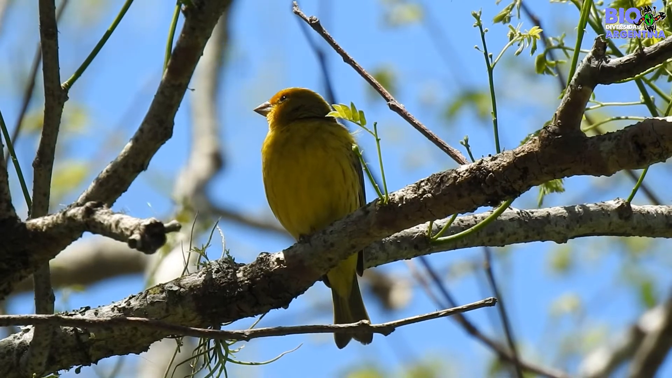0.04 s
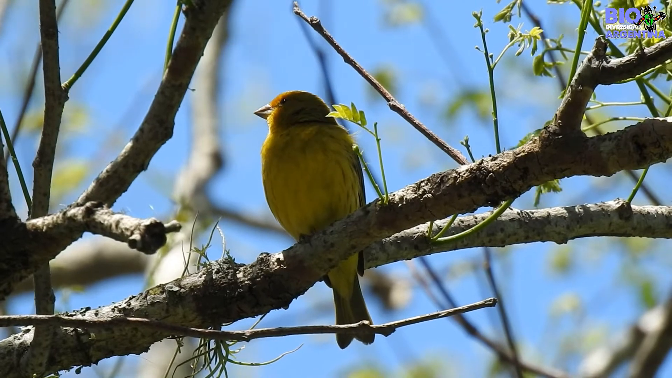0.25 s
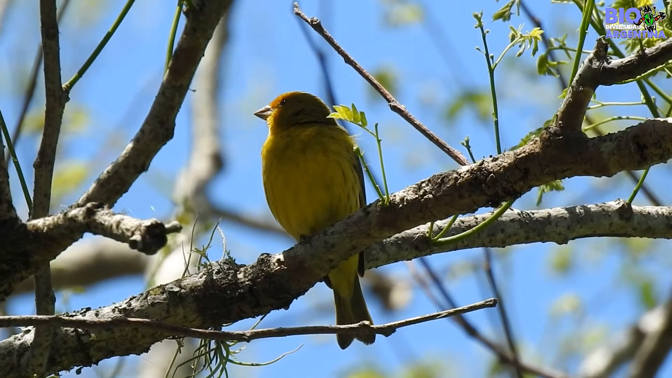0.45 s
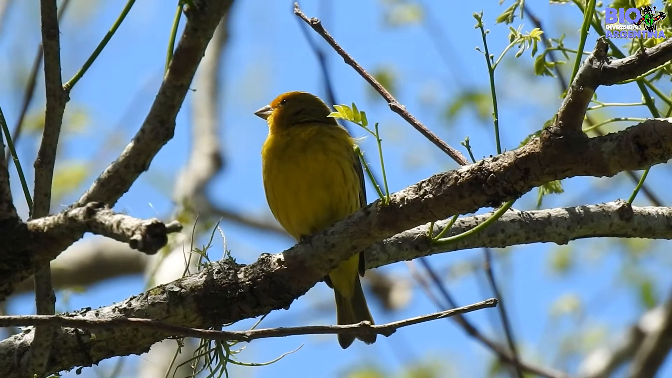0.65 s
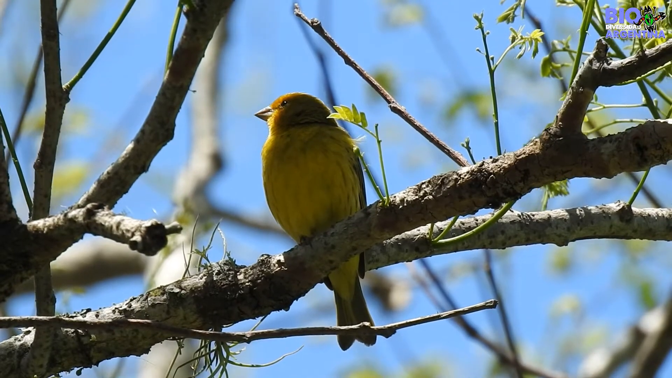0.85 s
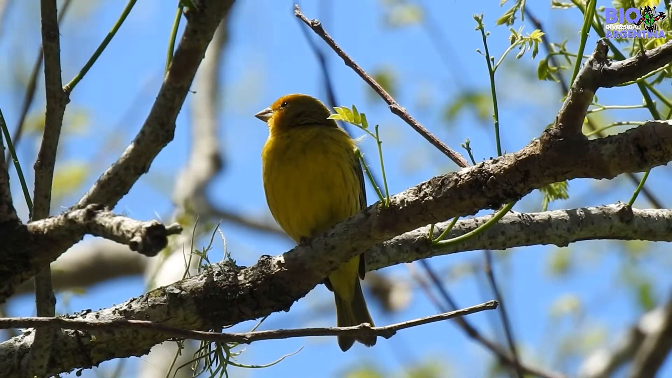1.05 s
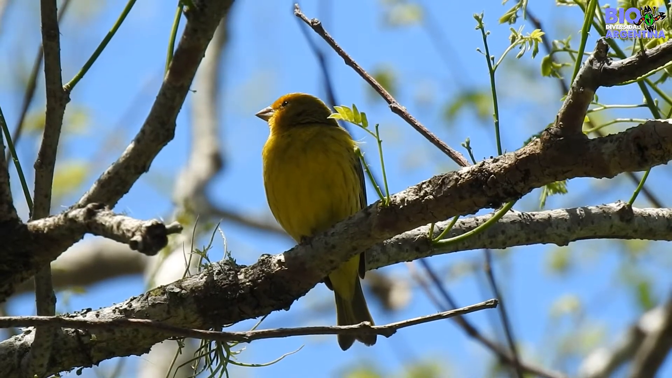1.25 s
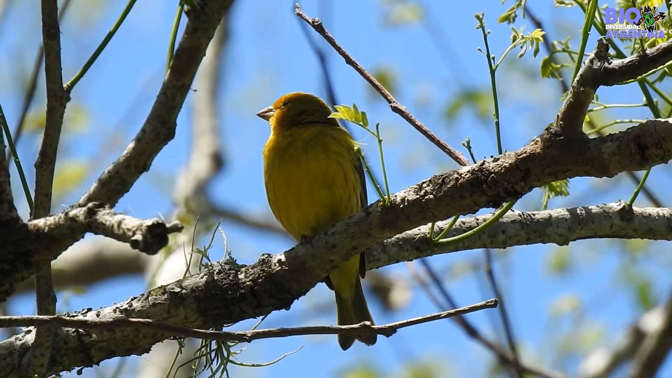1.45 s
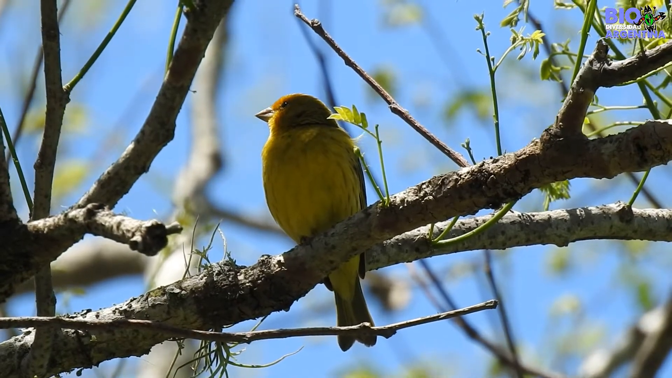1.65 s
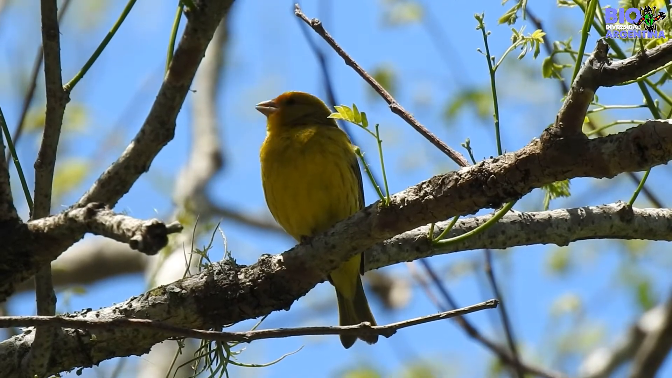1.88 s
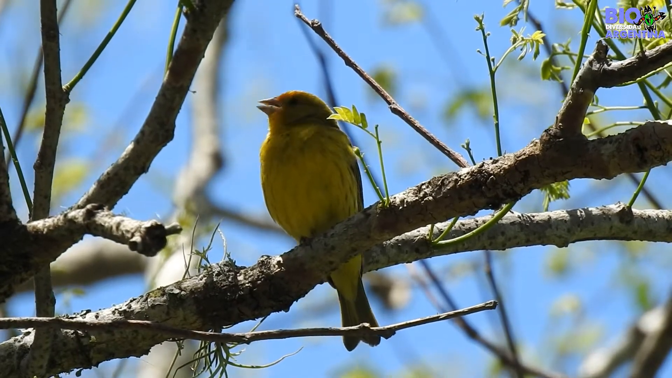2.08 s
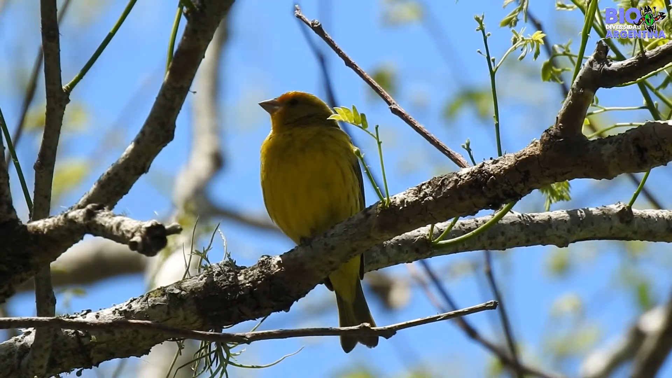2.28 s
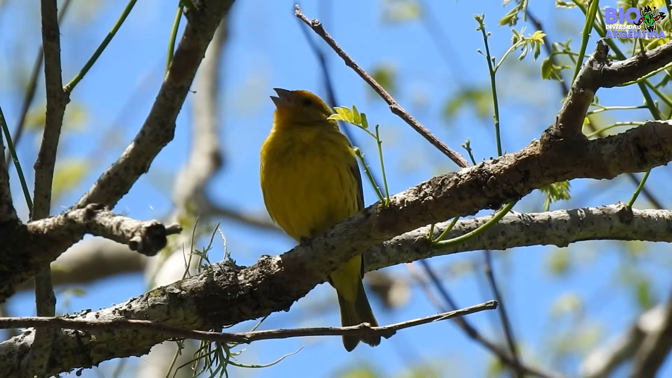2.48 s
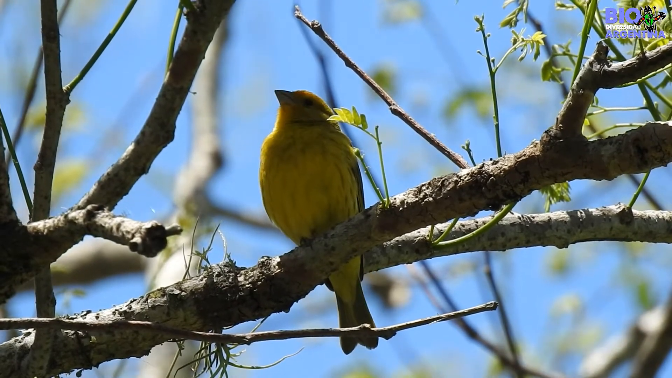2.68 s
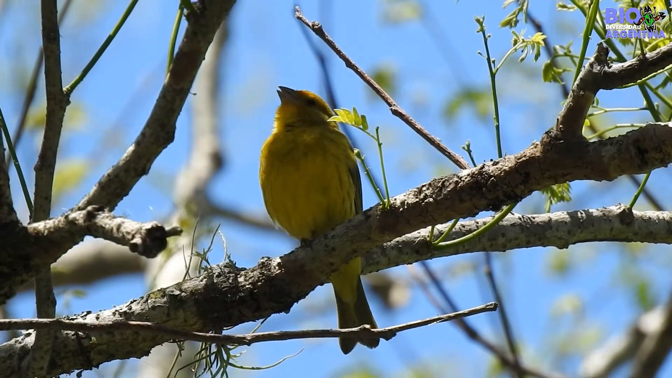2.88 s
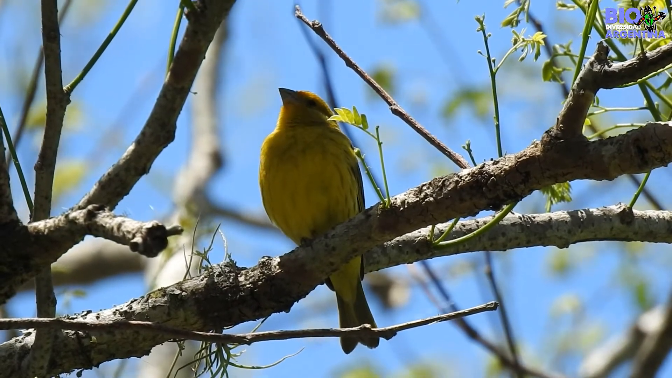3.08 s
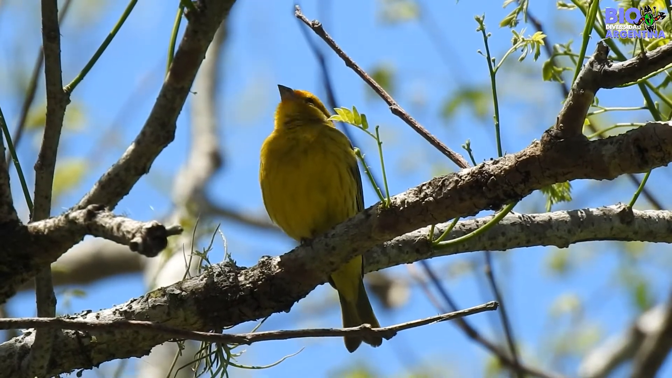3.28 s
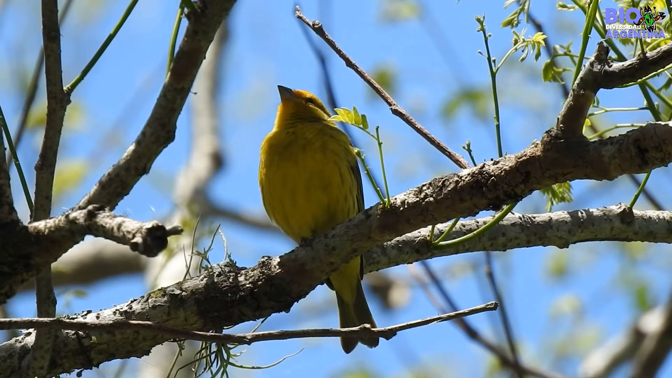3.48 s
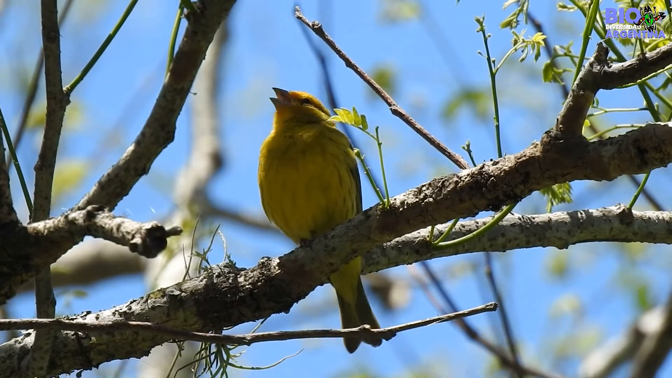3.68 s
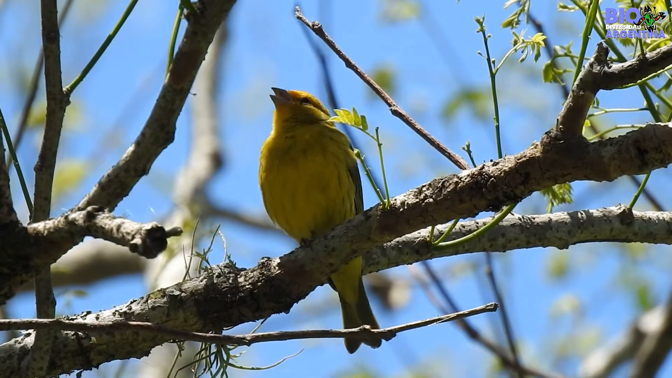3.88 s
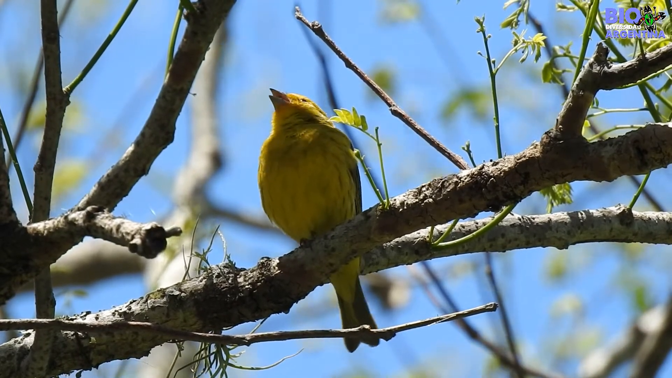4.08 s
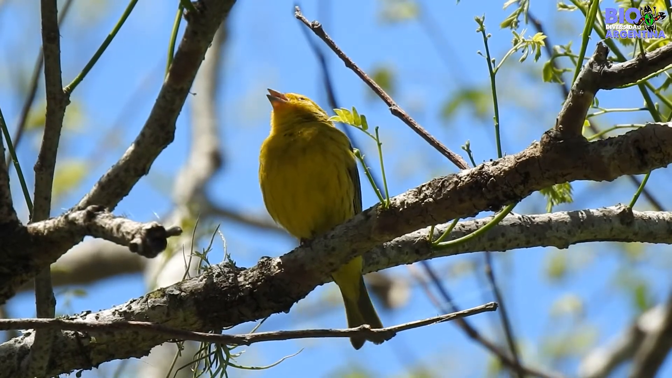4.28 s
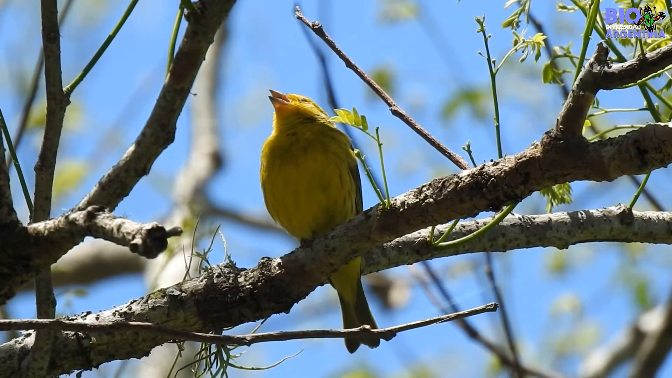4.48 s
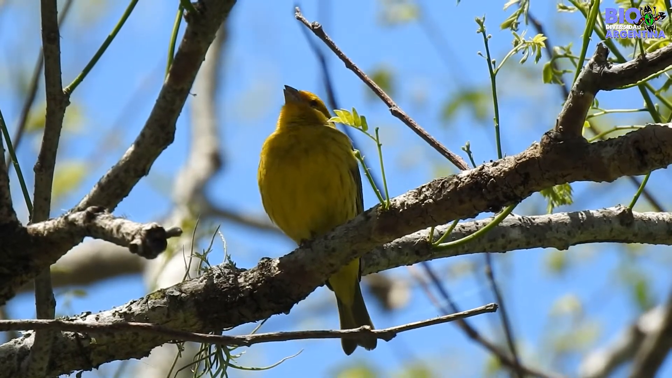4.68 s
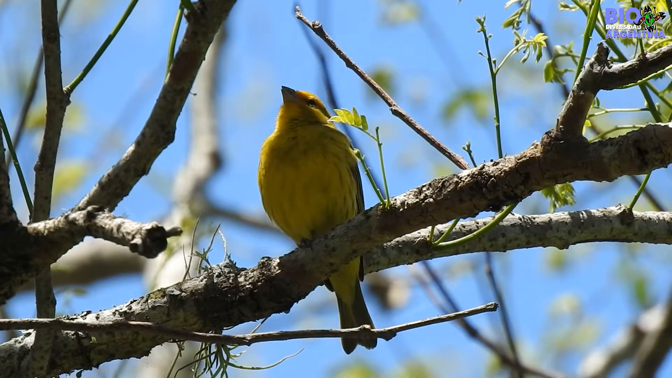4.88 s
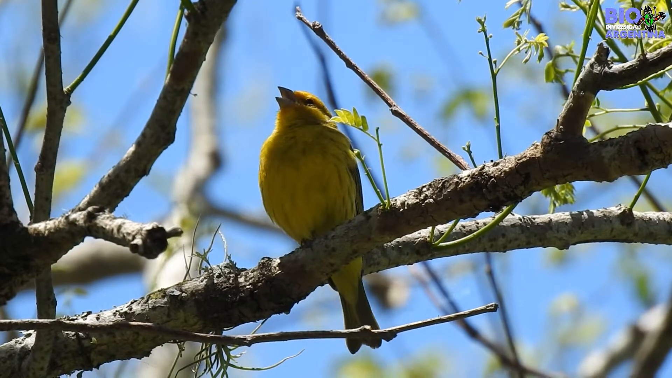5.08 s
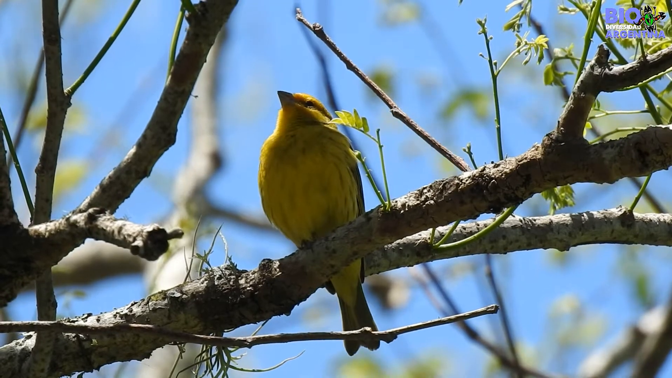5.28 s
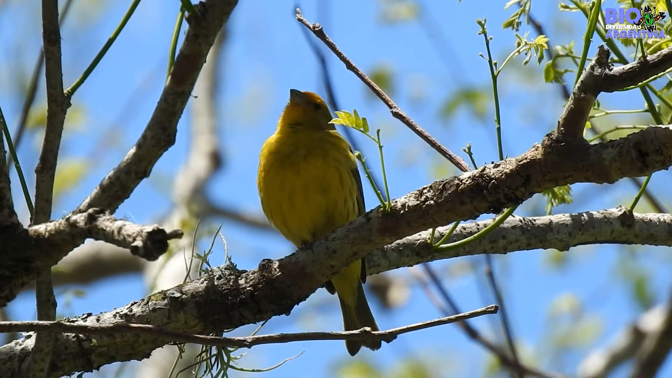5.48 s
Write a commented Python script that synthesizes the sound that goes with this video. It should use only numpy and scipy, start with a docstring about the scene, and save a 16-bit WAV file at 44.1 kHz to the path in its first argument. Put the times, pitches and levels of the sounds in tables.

```python
"""A finch sings close by: a syrinx, modelled as a gliding oscillator, whistles, slurs, trills and warbles.
A second bird chirps on a strong third harmonic, and decaying noise echoes stand for the trees scattering both.
Distant birds pipe and call in plain tones and a dove coos softly.
Far away a small engine, made of firing tones and filtered noise, revs up and down
over a low harmonic hum, a noise rumble and a faint high hiss."""
import sys
import numpy as np
from scipy import signal
from scipy.fft import rfft, irfft, next_fast_len
from scipy.io import wavfile
from scipy.ndimage import uniform_filter1d, map_coordinates

SR = 44100
rng = np.random.default_rng(int(sys.argv[2]) if len(sys.argv) > 2 else 0)


def wrap_up_sound(samples):
    """Save the sound to the file named by the first command line argument, as 16-bit audio."""
    columns = np.atleast_2d(samples).T
    # keep every value between -1 and 1, then stretch to whole-number steps
    tamed = np.clip(columns, -1, 1)
    steps = np.round(tamed * 32767).astype(np.int16)
    wavfile.write(sys.argv[1], SR, steps)


N = 244314

# Harmonics of the hum from the first up: relative level_db
HUM_HARMONICS_DB = [-16, 5, -2, -6, -38.5, -22]
HUM_HZ, HUM_DB = 55, -48
# Spectra of noise, in relative units: frequency_hz, density_db
RUMBLE_SPECTRUM = [(20, -38.5), (35, -8), (55, -6), (90, 1), (210, 0.5), (280, -14.5), (450, -19.5),
                   (900, -62.5)]
HISS_SPECTRUM = [(1410, -48), (2400, -11), (2830, -14), (3080, -1), (3390, -16), (4490, -1.5), (4970, -1.5),
                 (5540, 1), (6900, 6), (8720, -16), (11200, -16.5), (11600, -19.5), (15600, -25)]
RASP_SPECTRUM = [(150, -56), (260, -10), (367, -8), (413, -15), (552, -5.5), (722, -2.5), (925, -10.5),
                 (1060, -7.5), (1380, -1.5), (1750, -7.5), (1960, -5), (2920, -11), (3400, -11.5),
                 (4420, -16.5), (7480, -120)]
EXHAUST_SPECTRUM = [(110, -33.5), (150, 0), (175, 1.0), (220, -1.5), (270, -30.5), (500, -70.0)]
# Engine revs, before inertia rounds the peaks:
# peak_s, peak_firing_hz, run_up_s, run_down_s, exhaust_gain_db, rasp_gain_db
ENGINE_REVS = [(0.418, 87, 0.84, 0.34, 2, 1.5), (1.85, 92.6, .75, 0.2787, 2, -.5),
               (2.782, 118.7, .41, .72, -1, 1), (3.96, 110.7, .31, 0.827, 1.5, 0.5),
               (4.421, 115.4, 0.522, 0.39, 0, 1.5), (5.359, 114, .38, 0.75, 2.5, -1)]
IDLE_HZ, FULL_HZ = 71.34, 117.4  # firing rates at throttle 0 and 1

# Reverberation of the trees: frequency_hz, t60_s
TREE_DECAY = [(2000, 0.24), (6500, 0.44), (10000, 0.27)]

# Glided notes, a lead-in to a turn and a glide away (bow: + steep at first, - steep at last): # start_s,
# lead_in_s, glide_s, start_hz, turn_hz, end_hz, level_db, bow # the first far call is the faint, scattered
# start of the finch's rising whistle at 0.58 s
DOVE_COOS = [(2.53, .13, 0.37, 540, 547.5, 543, -56, 0.077), (3.71, .24, .18, 534, 776, 690, -53, -.5),
             (4.15, 0.153, .32, 540, 639.5, 531, -47.5, 0.614)]
FAR_BIRD_CALLS = [ (.525, 0.0465, 0.026, 5800, 5980, 6200, -44, 0.15),
                  (1.08, .09, 0.063, 4440, 4520, 4700, -55.5, -0.066),
                  (1.31, 0.038, 0.089, 4400, 4105, 3380, -57.5, 0.18),
                  (1.60, 0.054, .13, 3840, 4020, 3940, -58, 0),
                  (2.33, 0.023, 0.043, 3900, 3750, 3720, -53, 0),
                  (3.935, 0.02, 0.032, 4020, 4390, 4190, -35.5, -.8), ]
FINCH_SLURS = [ (2.725, 0.017, 0.014, 4340, 3650, 3160, -43, 0),
               (2.748, .012, 0.014, 4284, 3650, 3200, -40, 0),
               (3.222, 0.019, 0.029, 4470, 3850, 3400, -40.5, 0),
               (3.322, .012, .035, 3730, 3050, 2480, -41, 0.56),
               (3.625, 0.078, .055, 4720, 3220, 2630, -37, .5),
               (4.694, 0.069, 0.011, 5360, 3210, 2100, -29.5, 0), ]  # sung with overtones
FINCH_WHISTLES = [ (.580, 0.02, 0.13, 6060, 6110, 7690, -27, 0.56),
                  (1.940, .014, .011, 9400, 9780, 8300, -17.5, -.95),
                  (1.993, 0.0084, 0.018, 9850, 9940, 5670, -12.5, 1.03),
                  (2.151, 0.015, 0.0066, 9400, 10200, 8800, -12.5, -0.61),
                  (2.203, 0.0092, .015, 10650, 9950, 6270, -13, 0.24),
                  (2.519, .008, 0.0065, 7000, 8600, 8200, -11, -0.21),
                  (2.535, 0.0041, .019, 8400, 8530, 5700, -7.5, 0.22),
                  (2.579, 0.009, 0.0056, 7100, 8640, 8740, -9.5, 0),
                  (2.601, 0.0025, 0.013, 8950, 8850, 5600, -13, .15),
                  (2.649, 0.0037, 0.0044, 7900, 8600, 8400, -17.5, -0.36),
                  (2.672, 0.0054, 0.0068, 8700, 8250, 5650, -13.5, -.2),
                  (2.930, 0.0055, .027, 8100, 6800, 4800, -8.5, 0.34),
                  (2.994, 0.012, 0.068, 6760, 7135, 3420, -10, 0.22),
                  (3.295, 0.0084, 0.034, 6500, 8680, 5380, -9.5, 0.8),
                  (3.328, .022, .035, 5300, 4370, 3540, -22, 0.73),
                  (3.370, .010, .038, 5220, 6620, 3200, -5.5, -0.54),
                  (3.467, 0.0091, 0.018, 7750, 8510, 5330, -7.5, 0.22),
                  (3.492, 0.0092, 0.018, 5000, 4340, 3800, -24, -0.34),
                  (3.562, .012, 0.043, 4510, 6020, 4600, -29, 0.5),
                  (3.746, 0.011, 0.038, 6670, 8520, 5840, -8.5, 1.2),
                  (3.820, .030, .034, 6450, 8670, 5260, -9.5, .2),
                  (5.477, 0.0022, 0.0069, 7150, 7330, 7570, -15, 0.89),
                  (5.489, 0.0017, .048, 7180, 6830, 5380, -15.5, 1.2), ]  # levels before the beak's resonance
# A far bird's even pips
PIP_START_S, PIP_EVERY_S, PIP_LENGTH_S, PIP_HZ, PIP_DB = 0.052, .123, 0.046, 3176, -57

# Chirps of the second bird: start_s, top_pitch_hz, level_db, length_s
SECOND_BIRD_CHIRPS = [(0.429, 2466, -33.5, 0.062), (0.568, 2432, -26.5, 0.038), (0.697, 2360, -25, 0.037),
                      (0.824, 2309, -27, 0.041), (1.879, 2416, -27.5, .048), (1.997, 2370, -24.5, 0.04),
                      (2.109, 2250, -26, 0.044), (2.232, 2280, -25.5, 0.044), (2.366, 2290, -25, 0.044),
                      (2.482, 2340, -24.5, 0.047), (2.634, 2323, -23.5, 0.03), (3.68, 2364, -28, .052),
                      (3.803, 2443, -22.5, .052), (3.934, 2122, -31, 0.041), (4.086, 2247, -25.5, 0.043),
                      (4.211, 2207, -28.5, 0.045), (4.343, 2140, -29.5, 0.026), (4.476, 2158, -26, 0.023)]
# Harmonics of a chirp from the first up, before the throat: relative level_db
CHIRP_HARMONICS_DB = [-44, -15, -0.5, -13]
# Resonance of the second bird's throat: frequency_hz, gain_db
SECOND_BIRD_THROAT = [(3000, -5), (4500, -6), (7000, -0.5), (8000, 0), (9600, -18), (11000, -24.5)]
CHIRP_TOP_AT, CHIRP_HOOK = .66, .62  # share of the length at the top, depth of the arch
CHIRP_ONSET_DB, CHIRP_END_DB = -24, -6

# Resonance of the throat and open beak, weighing harmonics: frequency_hz, gain_db
OPEN_THROAT = [(2000, -24), (3000, -3), (3700, -9.5), (5200, 12), (7000, 10), (9000, -2), (11000, -15),
               (12500, -62)]
# Resonance of the beak, weighing a whistle by its pitch: pitch_hz, gain_db
BEAK_RESONANCE = [(3400, -23), (4850, -16), (6000, -5), (7000, -0.5), (8600, -7), (10000, -15.5),
                  (10700, -15)]
# One long arched slur: time_s, pitch_hz, level_db
ARCHED_SLUR = [(4.856, 2168, -41), (4.864, 2541, -35), (4.928, 2970, -30), (4.964, 2794, -33.5),
               (4.992, 2060, -40), (5.002, 1949, -39), (5.02, 1870, -42)]
# Notes of the trill: start_s, starting_pitch_hz before the ratio, level_db
TRILL_NOTES = [(3.996, 5730, -18), (4.035, 5840, -14), (4.078, 5824, -14), (4.124, 5760, -15.5),
               (4.174, 5810, -15.5), (4.222, 6000, -14.5), (4.267, 5720, -17), (4.314, 5780, -15),
               (4.362, 5780, -16), (4.408, 5700, -18.5), (4.453, 5680, -18.5), (4.499, 5650, -19),
               (4.546, 5850, -17), (4.598, 5860, -20.5)]
# Shape of every trill note: time_from_start_s, pitch_ratio, gain_db
TRILL_SHAPE = [(0, 0.96, -8.5), (.006, .92, -6), (.014, 0.81, -12), (.019, 0.69, -24), (0.022, 0.5, -6)]
# Warble: its start, length, swing rate, and a crest's time after the start
WARBLE_S, WARBLE_LENGTH_S, WARBLE_RATE_HZ, WARBLE_CREST_S = 5.123, .127, 33.6, .034
# Centre, nominal swing, and level before the beak
WARBLE_HZ, WARBLE_SWING_HZ, WARBLE_DB = 6410, 758, -14
# Scoop from below: how much lower, how much softer, and for how long
WARBLE_SCOOP_HZ, WARBLE_SCOOP_DB, WARBLE_SCOOP_S = 902, 9, 0.014

TOP_HZ = 15750  # upper band limit


def amp(db):
    """Decibels become an amplitude ratio."""
    return 10 ** (np.asarray(db) / 20)


def unit(x):
    """Division by the root mean square gives an rms of 1."""
    return x / np.sqrt(np.mean(x ** 2) + 1e-20)


def along(points, hz):
    """A response is interpolated linearly over logarithmic frequency."""
    f, v = np.transpose(points)
    return np.interp(np.log(hz + 1), np.log(f + 1), v)


def curves(rows):
    """Each column after the time is interpolated to one value per sample."""
    s, *cols = np.transpose(rows)
    return [np.interp(np.arange(N) / SR, s, c) for c in cols]


def wobble(rate):
    """A spline through random knots, rate of them a second, gives a smooth fluctuation."""
    knots = rng.standard_normal(int(N * rate / SR) + 4)
    return map_coordinates(knots, [np.arange(N) * rate / SR])


def filtered(x, response):
    """A linear filter multiplies the spectrum by its frequency response."""
    m = next_fast_len(N + SR // 2)
    return irfft(rfft(x, m) * response(np.fft.rfftfreq(m, 1 / SR)), m)[..., :N]


def spread(pair, side_db):
    """The sum and difference of a middle and a scaled side signal form left and right."""
    middle, side = pair[0], amp(side_db) * pair[1]
    return np.array([middle + side, middle - side])


def rush(spectrum, side_db, patchy_db):
    """Spectral shaping colours stereo noise of rms 1, with random gain in patches of time and frequency."""
    z = signal.stft(rng.standard_normal((2, N)), nperseg=2048)[2]
    field = uniform_filter1d(rng.standard_normal(z.shape[1:]), size=3, axis=0)
    field = uniform_filter1d(field, size=6, axis=1)
    pair = signal.istft(z * amp(patchy_db * unit(field)), nperseg=2048)[1][:, :N]
    coloured = filtered(pair, lambda hz: amp(along(spectrum, hz)))
    return unit(spread(coloured, side_db))


def glides(rows, onset_db, end_db, lead_bow):
    """Two bowed sweeps meet at a turn; the level bends from its onset offset to its end offset."""
    u = np.linspace(0, 1, 16)
    sweep = lambda a, b, bow: a + (b - a) * (u + bow * u * (1 - u))
    notes = []
    for s, lead_s, glide_s, start_hz, turn_hz, end_hz, db, bow in rows:
        lead = [s + lead_s * u, sweep(start_hz, turn_hz, lead_bow), db + onset_db * (1 - u) ** 2]
        away = [s + lead_s + glide_s * u, sweep(turn_hz, end_hz, bow), db + end_db * u ** 2]
        notes.append(np.vstack([np.transpose(lead), np.transpose(away)[1:]]))
    return notes


def sing(notes, partials, throat, jitter, edge):
    """Source and filter: a syrinx glides in pitch and the throat weighs its harmonics as they pass."""
    out = np.zeros(N + SR)
    waver = 1 + jitter * np.pad(wobble(500), (0, SR))
    for note in notes:
        s, hz, db = np.transpose(sorted(map(tuple, note)))
        i = np.arange(int(s[0] * SR), int(s[-1] * SR))
        t = i / SR
        pitch = uniform_filter1d(np.interp(t, s, hz), size=150, mode="nearest") * waver[i]
        phase = 2 * np.pi * np.cumsum(pitch) / SR
        gains = np.array([amp(level + along(throat, k * pitch)) for k, level in enumerate(partials, 1)])
        tone = sum(g * np.sin(k * phase) for k, g in enumerate(gains, 1))
        tone = tone / np.linalg.norm(gains, axis=0)  # the throat changes timbre, not total power
        from_edge = np.minimum(t - s[0], s[-1] - t) / edge
        gate = np.sin(np.pi / 2 * np.clip(from_edge, 0, 1)) ** 2
        out[i] += np.sqrt(2) * amp(np.interp(t, s, db)) * gate * tone
    return out[:N]


def surroundings():
    """Additive harmonics make a wavering machine hum; filtered noise makes distant rumble and outdoor hiss."""
    phase = 2 * np.pi * HUM_HZ * np.arange(N) / SR
    lines = sum(amp(db + 3.8 * wobble(5.1)) * np.sin(k * phase) for k, db in enumerate(HUM_HARMONICS_DB, 1))
    hum = amp(HUM_DB) * unit(lines)
    rumble = amp(-51.5 + 0.45 * wobble(4.4)) * rush(RUMBLE_SPECTRUM, side_db=-12.5, patchy_db=1.5)
    drift = amp(1.3 * wobble(6))
    hiss = amp(-48.5) * drift * rush(HISS_SPECTRUM, side_db=0, patchy_db=1.5)
    return hum + rumble + hiss


def firing_rate():
    """Inertia, as a moving average, rounds the run from idle to each peak and back."""
    revs = [curves([(s - up, IDLE_HZ), (s, hz), (s + down, IDLE_HZ)])[0]
            for s, hz, up, down, *_ in ENGINE_REVS]
    return uniform_filter1d(np.max(revs, axis=0), size=5000, mode="nearest")


def engine():
    """Orders of the firing rate sound with noise; firing tone, drone and rasp grow louder with speed."""
    rate = firing_rate()
    exhaust_db, rasp_db = curves([(s, *levels) for s, hz, up, down, *levels in ENGINE_REVS])
    throttle = np.clip((rate - IDLE_HZ) / (FULL_HZ - IDLE_HZ), 1e-6, None)
    loudness = lambda idle_db, full_db, law: amp(idle_db + (full_db - idle_db) * throttle ** law)
    phase = 2 * np.pi * np.cumsum(rate * (1 + 0.01078 * wobble(17))) / SR
    order = lambda k: np.sin(k * phase + rng.uniform(0, 2 * np.pi)) * amp(1.6 * wobble(11.0))

    firing = loudness(idle_db=-59, full_db=-39.5, law=0.69) * unit(order(0.99))
    exhaust = rush(EXHAUST_SPECTRUM, side_db=-33, patchy_db=4.5)
    drone = unit(order(1.5) + amp(-7) * order(2) + amp(-2.5) * exhaust)
    drone = loudness(idle_db=-56, full_db=-37.0, law=1.1) * drone
    rasp = rush(RASP_SPECTRUM, side_db=-12.5, patchy_db=4) * (1 + 0.064 * np.sin(phase))
    rasp = loudness(idle_db=-51.5, full_db=-43.0, law=1.0) * amp(rasp_db + 0.35 * wobble(10)) * rasp
    return amp(exhaust_db) * (firing + drone) + rasp


def pips(count):
    """Periodic repetition spaces equal notes of one nominal pitch."""
    starts = PIP_START_S + PIP_EVERY_S * np.arange(count)
    return [[(s, PIP_HZ, PIP_DB), (s + PIP_LENGTH_S, PIP_HZ, PIP_DB)] for s in starts]


def distant_birds():
    """Single-partial oscillators make soft coos, wavering thin calls and a row of pips; the first call is the
    faint start of the finch's rising whistle."""
    coo_notes = glides(DOVE_COOS, onset_db=0, end_db=-10, lead_bow=0.22)
    call_notes = glides(FAR_BIRD_CALLS, onset_db=2, end_db=-7.5, lead_bow=.3)
    coos = sing(coo_notes, [0], OPEN_THROAT, jitter=0.0044, edge=0.013)
    calls = sing(call_notes, [0], OPEN_THROAT, jitter=0.014, edge=.015)
    piping = sing(pips(count=10), [0], OPEN_THROAT, jitter=0.017, edge=0.0099)
    return coos + calls + piping


def second_bird():
    """A strong third harmonic carries chirps that hook up to a rounded top and swell on the way."""
    share = np.linspace(0, 1, 12)
    arch = 1 - CHIRP_HOOK * (share - CHIRP_TOP_AT) ** 2
    swell_db = np.interp(share, [0, .24, .34, .8, 1], [CHIRP_ONSET_DB, -9, 0, 0, CHIRP_END_DB])
    notes = [np.transpose([s + share * length, hz * arch, db + swell_db])
             for s, hz, db, length in SECOND_BIRD_CHIRPS]
    return sing(notes, CHIRP_HARMONICS_DB, SECOND_BIRD_THROAT, jitter=0.014, edge=0.001)


def warble():
    """Frequency modulation: a whistle scoops up into a fast vibrato that widens, then narrows."""
    share = np.linspace(0, 1, 70)
    t = WARBLE_LENGTH_S * share
    scoop = np.clip(1 - t / WARBLE_SCOOP_S, 0, 1)
    swing = WARBLE_SWING_HZ * np.interp(share, [.14, .28, .6, 1], [0.12, 0.6, 1.07, 0.475])
    vibrato = swing * np.cos(2 * np.pi * WARBLE_RATE_HZ * (t - WARBLE_CREST_S))
    hz = WARBLE_HZ - WARBLE_SCOOP_HZ * scoop + vibrato
    db = WARBLE_DB - WARBLE_SCOOP_DB * scoop ** 2 + np.interp(share, [0, .75, 1], [-2, 1.5, -3])
    return np.transpose([WARBLE_S + t, hz, db])


def through_beak(note):
    """Resonance: a whistle swells as its pitch passes the beak's best frequency."""
    s, hz, db = np.transpose(note)
    return np.transpose([s, hz, db + along(BEAK_RESONANCE, hz)])


def finch():
    """Harmonic content sets the voice: pure whistles and warble, reedy slurs, a two-partial trill."""
    whistles = glides(FINCH_WHISTLES, onset_db=-6, end_db=-7.5, lead_bow=.6) + [warble()]
    slurs = glides(FINCH_SLURS, onset_db=-6.0, end_db=-2.0, lead_bow=0.42) + [ARCHED_SLUR]
    trill_notes = [[(s + dt, hz * ratio, db + swell) for dt, ratio, swell in TRILL_SHAPE]
                   for s, hz, db in TRILL_NOTES]
    pure = sing([through_beak(note) for note in whistles], [0], OPEN_THROAT, jitter=0.0016, edge=0.0018)
    reedy = sing(slurs, [0, -3, -12], OPEN_THROAT, jitter=0.0028, edge=0.0013)
    trill = sing(trill_notes, [0, -7], OPEN_THROAT, jitter=0.0066, edge=0.0014)
    return pure + reedy + trill


def scatter(x, near_db, near_t60, far_db, side_db):
    """Convolution with decaying noise: near branches answer, and trees around decay by frequency."""
    hz, t, z = signal.stft(rng.standard_normal((2, SR // 2)), SR, nperseg=256)
    decay = amp(-60 * t / along(TREE_DECAY, hz)[:, None])
    far = signal.istft(z * decay, SR, nperseg=256)[1]
    age = np.arange(far.shape[1]) / SR
    near = rng.standard_normal(far.shape) * amp(-60 * age / near_t60)
    tail = amp(near_db) * near / np.linalg.norm(near[0]) + amp(far_db) * far / np.linalg.norm(far[0])
    tail = tail * (age > .0015)  # no echo in the first 1.5 ms
    return signal.fftconvolve(x[None], spread(tail, side_db), axes=1)[:, :N]


def scene():
    """Direct and scattered sound add: the further off a bird, the more scattered it is."""
    near, other, far = finch(), second_bird(), distant_birds()
    # the direct songs lean slightly to the left
    song = near * amp([[.7], [-.7]])
    song = song + scatter(near, near_db=-6.0, near_t60=0.075, far_db=-9.5, side_db=-2)
    chirps = amp(0.5) * other * amp([[.4], [-.4]])
    chirps = chirps + scatter(other, near_db=2.5, near_t60=0.14, far_db=-6, side_db=-3.0)
    others = amp(-5.5) * far + scatter(far, near_db=-2.5, near_t60=0.19, far_db=-5.5, side_db=-18.5)
    return song + chirps + others + engine() + surroundings()


def record(dry):
    """An ideal low-pass filter removes everything from the band limit upward."""
    return filtered(dry, lambda hz: hz < TOP_HZ)


dry = scene()
out = record(dry)
wrap_up_sound(out)
```